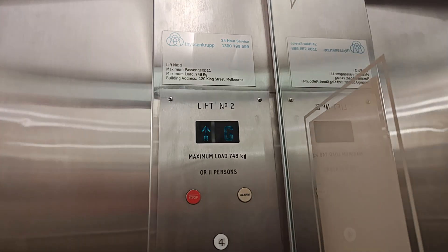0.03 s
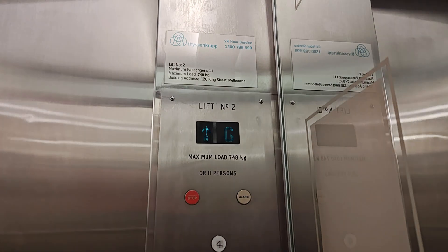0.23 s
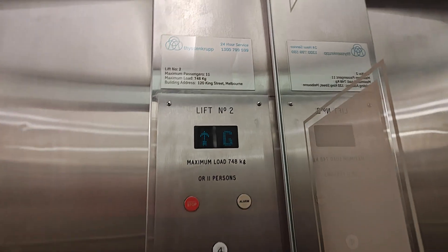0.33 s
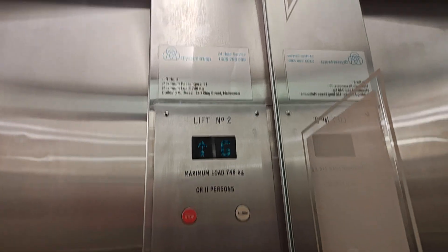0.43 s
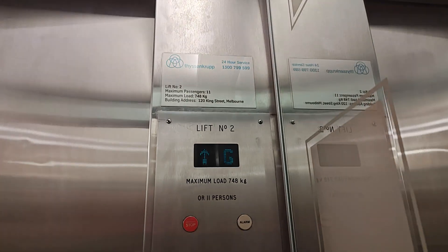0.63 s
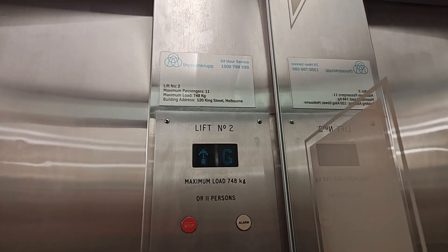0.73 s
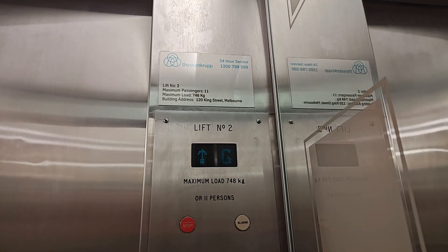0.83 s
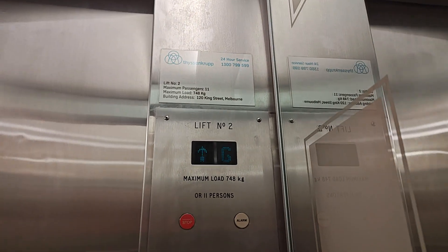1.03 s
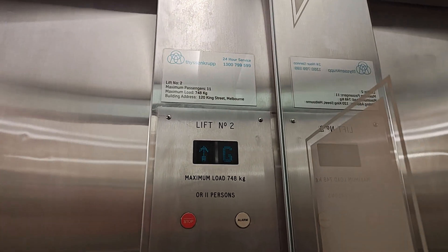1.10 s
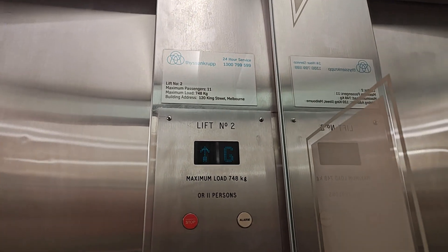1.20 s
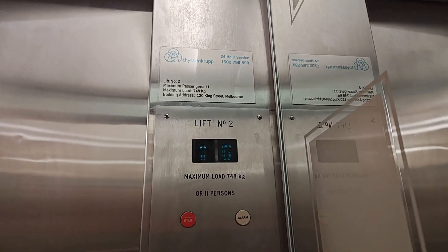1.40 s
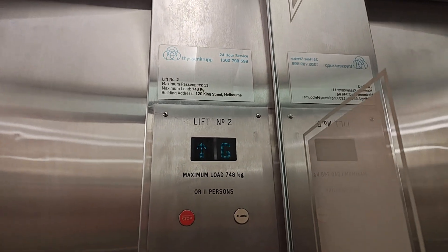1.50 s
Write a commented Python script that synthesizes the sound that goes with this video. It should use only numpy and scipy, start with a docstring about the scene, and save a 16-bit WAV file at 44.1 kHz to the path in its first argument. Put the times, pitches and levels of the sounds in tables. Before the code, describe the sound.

Steel lift doors bang closed twice, clanging and shuddering, heard from inside the car.

```python
"""Lift doors close, heard from inside a small steel car: two hard thuds, then the panels rattle home.
Each blow makes the steel sheets clang, the door panels and walls ring, and the latch knock.
The car goes on shuddering with a deep rumble, and loose metal parts clink and tick faintly.
It all dies away into the hiss of the ventilation and the faint tones of its fan."""
import sys
import numpy as np
from scipy import signal
from scipy.fft import rfft, irfft
from scipy.io import wavfile
from scipy.ndimage import uniform_filter1d, minimum_filter1d

SR = 44100
rng = np.random.default_rng(int(sys.argv[2]) if len(sys.argv) > 2 else 0)


def bounce(signal):
    """Save signal as a 16-bit WAV file at the path given by the first command-line argument."""
    frames = np.transpose(np.atleast_2d(signal))
    limited = np.clip(frames, -1, 1)
    pcm = np.round(limited * 32767).astype(np.int16)
    wavfile.write(sys.argv[1], SR, pcm)


N = 68355
T = np.arange(N) / SR
HZ = np.maximum(np.arange(N // 2 + 1) * SR / N, 1)

# Levels are relative. A fade is the time a sound takes to drop by 60 dB.
# door blows: t/s, clang level/dB, extra treble/dB, clang rise/s, panel level/dB, latch level/dB
BLOWS = [(0.174, -48, 18, 0.0058, -19, -68), (0.194, -32.5, 0, .001, -13, -25),
         (0.2132, -14, 1.5, 0.0048, 0.5, -10), (0.233, -15, -8, .003, 0, -24), (0.3865, -12, 0, 0.01, 3, 1),
         (0.441, -19, 7.5, 0.013, -5, -27.5), (0.533, -21.5, 0.5, 0.0032, -19.5, -23.5)]
# tone colour of the clanging steel: f/Hz, level/dB
CLANG_SPECTRUM = [(100, -8), (200, -12), (290, -4.5), (400, -10), (660, -13), (780, -22), (1100, -21.5),
                  (2200, -24.5), (3700, -23.5), (6600, -20), (9200, -26), (10600, -47)]
# how long the steel rings: f/Hz, fade/s
CLANG_FADES = [(120, 1), (400, 0.57), (1500, 0.55), (4000, 0.66), (9000, 0.26)]
# natural tones of the door panels and the car: f/Hz, level/dB, fade/s
PANEL_TONES = [(135.5, -13.5, 0.96), (148, -17, 0.74), (197.2, -19, 0.67), (228, -22, .6),
               (246.9, -18.5, 0.73), (286.4, -12, 0.52), (323.6, -30, 0.63), (355, -40.5, 0.41),
               (401, -29, .6), (441, -32, 0.18), (519.6, -29.5, 0.74), (649, -24, 0.62), (699, -33.5, 0.35),
               (939, -33, .65), (1279, -39, .65)]
# thin high ring of the door steel: f/Hz, level/dB, fade/s
SHIMMER_TONES = [(1611, -43, 0.58), (4830, -53, 1), (5490, -38, 0.19), (7820, -37.5, 0.39),
                 (8200, -42, 0.61)]
# short knock of the latch: f/Hz, level/dB, fade/s
LATCH_TONES = [(536, -21, 0.25), (695.6, -12, 0.081), (812, -22, 0.11), (997, -27, 0.14), (1055, -34, 0.17)]
# deep rumble of the car: t/s, level/dB
DEEP_RUMBLE = [(0.1, -75), (0.164, -57), (0.228, -19), (0.252, -8), (0.394, -29.5), (0.426, -11.5),
               (0.548, -14), (0.58, -19), (0.624, -11), (0.648, -5.5), (0.726, -22.5), (0.906, -18),
               (0.976, -37.5), (1.084, -25.5), (1.104, -33), (1.146, -25), (1.178, -39), (1.266, -32),
               (1.302, -50.5), (1.55, -60)]
# upper rumble of the car: t/s, level/dB
UPPER_RUMBLE = [(0.1, -45), (0.16, -53.5), (0.244, -16), (0.28, -18), (0.552, -19), (0.624, -34.5),
                (0.66, -33.5), (0.734, -29.5), (1.142, -40.5), (1.162, -35), (1.384, -55.5), (1.55, -59.5)]
# clinks and ticks of the mechanism: t/s, level/dB, f/Hz, width/octaves, fade/s
TICKS = [(0.094, -46, 3120, 1.5, 0.056), (0.146, -52.5, 2140, 0.58, 0.4), (0.151, -44, 262, 0.53, 0.086),
         (0.2323, -22.5, 1544, .5, 0.13), (0.298, -28.5, 5030, 0.49, 0.11),
         (0.446, -24.5, 8260, 0.091, 0.35), (0.537, -25.5, 8090, 0.1, 0.25),
         (0.886, -47.5, 7900, 0.13, 0.013), (1.058, -50.5, 128, 0.27, 0.16),
         (1.091, -46.5, 643, 1.3, 0.011), (1.133, -48.5, 3900, .2, .025)]
# faint scuffs: t/s, level/dB, f/Hz, width/octaves, spread in time/s
SCUFFS = [(0.04, -61, 2510, 0.3, 0.089), (0.79, -69, 1670, 0.64, 0.13), (1.03, -68.5, 1585, 0.59, 0.059),
          (1.124, -57, 5170, 0.33, 0.0096), (1.532, -61, 2520, 1, 0.013)]
# tone colour of the moving air: f/Hz, level/dB
AIR_SPECTRUM = [(59, -15), (100, 11.5), (180, -2.5), (214, 0.5), (270, -8.5), (310, 2.5), (369, -3),
                (495, -3.5), (546, -5.5), (871, -15), (1760, -27), (8710, -18), (10600, -40.5),
                (13800, -33), (22000, -120)]
# strength of the ventilation: t/s, low rush level/dB, hiss level/dB
AIR_LEVELS = [(0, -48.5, -46.5), (.17, -63.5, -45), (.4, -55, -45), (.85, -56.5, -57.5), (1.0, -57, -54.5),
              (1.18, -66.5, -57.5), (1.3, -62, -48.5), (1.55, -59.5, -53.5)]
# tones of the fan: f/Hz, level/dB
FAN_TONES = [(134.6, -66), (215, -77), (248, -69.5), (296, -71), (398, -71), (490, -77.5), (595, -69)]
# tone colour of the two microphone openings: f/Hz, left level/dB, right level/dB
MIC_COLOUR = [(93, 4, 4.5), (324, -0.23, 1.2), (583, -1, 3), (1020, 6.5, 8), (2040, 5, 8.5), (3200, -1, 1),
              (5580, 4.5, -11), (6560, -6.5, -9), (7990, -25, 3), (10400, -28, 8)]
# how alike left and right are: f/Hz, likeness (1 the same, -1 opposite)
LIKENESS = [(150, 0.98), (280, 1), (550, 0.62), (1100, -0.41), (2300, 0.13), (9000, -0.21)]


def steel_clang():
    """Each blow wakes countless overlapping tones in the steel sheets: a crack, then a longer ring."""
    crack_db, crack_fade_s, treble_hz = 0.5, 0.25, 5180
    seated_s, damping_db_per_s = 0.59, 118
    steel = noise(undb(look_up(CLANG_SPECTRUM, HZ)) * low_cut(hz=117) * resonances(depth_db=2.5))
    flutter = undb(0.06 * wobble(rate_hz=37))  # loose panels flutter very slightly in their guides
    octaves_hz = 125 * 2. ** np.arange(7)
    out = 0
    for hz, share in zip(octaves_hz, np.eye(len(octaves_hz))):
        band = colour(steel, np.interp(np.log(HZ), np.log(octaves_hz), share))
        treble = hz ** 2 / (hz ** 2 + treble_hz ** 2)
        build_s = 0.69 / hz  # low notes build up later
        power = 0
        for start, db, treble_db, rise_s, _, _ in BLOWS:
            tail = strike(start, rise_s + build_s, look_up(CLANG_FADES, hz))
            crack = undb(crack_db) * strike(start, rise_s + build_s, crack_fade_s)
            power = power + undb(db + treble * treble_db) ** 2 * (tail ** 2 + crack ** 2)
        # once the doors sit tight, the treble dies faster
        damping = undb(-damping_db_per_s * np.sqrt(treble) * np.maximum(T - seated_s, 0))
        out = out + band * np.sqrt(power) * damping
    return out * flutter * undb(-3.5)


def ring(tones, blow_column, rise_at_250_hz_s):
    """Struck metal: its tones swell after each blow, then fade, and waver as the panels shift."""
    out = 0
    for hz, db, fade_s in tones:
        rise_s = rise_at_250_hz_s * (250 / hz) ** 1.97  # the lowest tones swell most slowly
        power = sum((undb(blow[blow_column]) * strike(blow[0], rise_s, fade_s)) ** 2 for blow in BLOWS)
        phase = 2 * np.pi * (hz * T + rng.random()) + 0.62 * wobble(rate_hz=14)
        apart = np.arccos(look_up(LIKENESS, hz)) / 2  # puts left and right out of step
        sides = np.array([[1], [-1]]) * np.sign(rng.standard_normal())
        out = out + undb(db) * np.sqrt(power) * np.sin(phase + apart * sides)
    return out


def door_panels():
    """The struck panels boom at their low tones and shimmer at their high ones."""
    boom = ring(PANEL_TONES, blow_column=4, rise_at_250_hz_s=0.048)
    shimmer = ring(SHIMMER_TONES, blow_column=4, rise_at_250_hz_s=0.048)
    return undb(-2) * boom + shimmer


def latch():
    """The latch rings so briefly that it sounds like a knock."""
    return ring(LATCH_TONES, blow_column=5, rise_at_250_hz_s=0.03)


def shudder(levels, hz, width_hz, evenness):
    """The car shakes at random around one pitch; more evenness gives a steadier strength."""
    hump = 1 / (1 + ((HZ - hz) / width_hz) ** 4)
    motion = np.fft.ifft(np.fft.fft(rng.standard_normal(N))[:len(HZ)] * hump, N)
    shake = motion.real / np.abs(motion) ** evenness
    return shake / shake.std() * undb(np.interp(T, *np.array(levels).T))


def car_rumble():
    """The car shudders around two low pitches, almost the same on the left and right."""
    middle, side = (shudder(DEEP_RUMBLE, hz=34.9, width_hz=10, evenness=0.82) * undb(-3)
                    + shudder(UPPER_RUMBLE, hz=76.6, width_hz=15.9, evenness=0.81) * undb(-5.5)
                    for _ in range(2))
    rumble = middle + undb(-24) * side * np.array([[1], [-1]])
    return signal.sosfiltfilt(signal.butter(4, 120, fs=SR, output="sos"), rumble)


def door_drive():
    """The drive hums, and stops just before the doors meet."""
    hz, db, stop_s, release_s = 101.9, -33.5, 0.043, 0.0087
    return undb(db) * np.sin(2 * np.pi * hz * T) * np.exp(-np.maximum(T - stop_s, 0) / release_s)


def mechanism():
    """Loose metal parts clink and tick sharply; faint scuffs swell and fade around the doors."""
    ticks = sum(undb(db) * noise_band(hz, width) * strike(start, 0.0011, fade_s)
                for start, db, hz, width, fade_s in TICKS)
    scuffs = sum(undb(db) * noise_band(hz, width) * np.exp(-.5 * ((T - peak_s) / spread_s) ** 2)
                 for peak_s, db, hz, width, spread_s in SCUFFS)
    return ticks + scuffs


def ventilation():
    """Moving air makes a low rush with a thin hiss on top."""
    hiss_hz = 1200
    air = noise(undb(look_up(AIR_SPECTRUM, HZ)) * low_cut(hz=115) * resonances(depth_db=1))
    hiss = colour(air, HZ ** 2 / (HZ ** 2 + hiss_hz ** 2))
    times, rush_db, hiss_db = np.array(AIR_LEVELS).T
    return (air - hiss) * undb(np.interp(T, times, rush_db)) + hiss * undb(np.interp(T, times, hiss_db))


def fan():
    """The ventilation fan adds faint, wavering tones."""
    return sum(undb(db + wobble(rate_hz=3.9)) * np.sin(2 * np.pi * hz * T + .6 * wobble(rate_hz=6))
               for hz, db in FAN_TONES)


def undb(db):
    """Turn decibels into a gain, the number to multiply a sound by."""
    return 10 ** (np.asarray(db) / 20)


def look_up(table, hz, column=1):
    """A table's value at any frequency, sliding between its rows by pitch."""
    table = np.array(table)
    return np.interp(np.log(hz), np.log(table[:, 0]), table[:, column])


def colour(sound, gain):
    """Turn each frequency of a sound up or down by its own gain."""
    return irfft(rfft(sound) * gain, N)


def noise(gain):
    """Stereo noise of strength 1 with this tone colour, alike on both sides in the bass."""
    likeness = look_up(LIKENESS, HZ)
    middle = colour(rng.standard_normal(N), gain * np.sqrt((1 + likeness) / 2))
    side = colour(rng.standard_normal(N), gain * np.sqrt((1 - likeness) / 2))
    return np.array([middle + side, middle - side]) / np.sqrt(np.mean(gain ** 2))


def noise_band(hz, octaves):
    """Noise gathered around one pitch."""
    return noise(np.exp(-.5 * (np.log2(HZ / hz) / octaves) ** 2))


def low_cut(hz):
    """Gains that drop steeply below a frequency."""
    return 1 / np.sqrt(1 + (hz / HZ) ** 8)


def resonances(depth_db, spacing_hz=15):
    """Gains for countless small resonances: close random peaks and dips, shallower in the bass."""
    spots_hz = np.arange(0, SR / 2, spacing_hz)
    bumps = np.interp(HZ, spots_hz, rng.standard_normal(N)[:len(spots_hz)])
    gain = undb(depth_db * HZ / (HZ + 500) * bumps)
    return gain / np.sqrt(np.mean(gain ** 2))


def wobble(rate_hz):
    """A smooth random drift with a typical size of 1."""
    drift = colour(rng.standard_normal(N), np.exp(-(HZ / rate_hz) ** 2))
    return drift / drift.std()


def strike(start, rise_s, fade_s):
    """The strength of a hit over time: it climbs, then dies away."""
    age = np.maximum(T - start, 0)
    return np.minimum(age / max(rise_s, 1e-4), 1) * np.exp(-np.log(1000) * age / fade_s)


def scene():
    """Everything heard in the car; the ringing drops as the panels come to rest."""
    rest_s, drop_s, drop_db = 0.701, 0.1, -6
    settle = undb(drop_db * np.clip((T - rest_s) / drop_s, 0, 1))
    doors = (steel_clang() + door_panels() + latch()) * settle
    return doors + car_rumble() + door_drive() + mechanism() + ventilation() + fan()


def record(dry):
    """Each microphone opening colours its side; loud peaks are held down and the top treble is cut."""
    ceiling, window_samples, top_hz = 0.93, 601, 10400
    sound = colour(dry, undb([look_up(MIC_COLOUR, HZ, column=1), look_up(MIC_COLOUR, HZ, column=2)]))
    allowed_gain = ceiling / np.maximum(np.abs(sound).max(axis=0), ceiling)
    smooth_gain = uniform_filter1d(minimum_filter1d(allowed_gain, window_samples), window_samples)
    return signal.sosfilt(signal.ellip(8, .2, 60, top_hz, fs=SR, output="sos"), sound * smooth_gain)


dry = scene()
out = record(dry)
bounce(out)
```